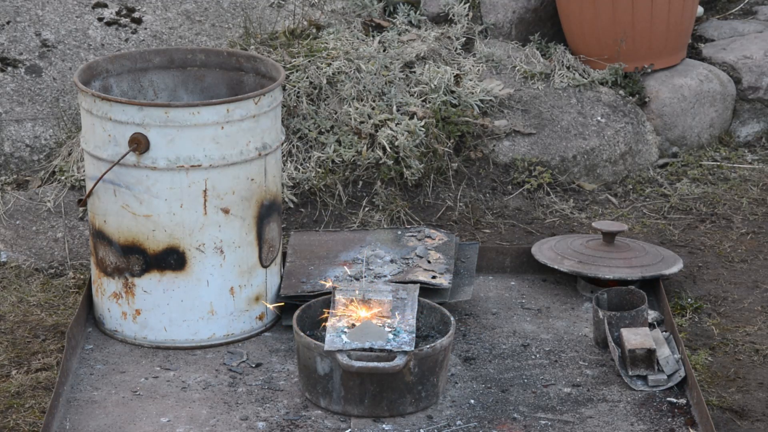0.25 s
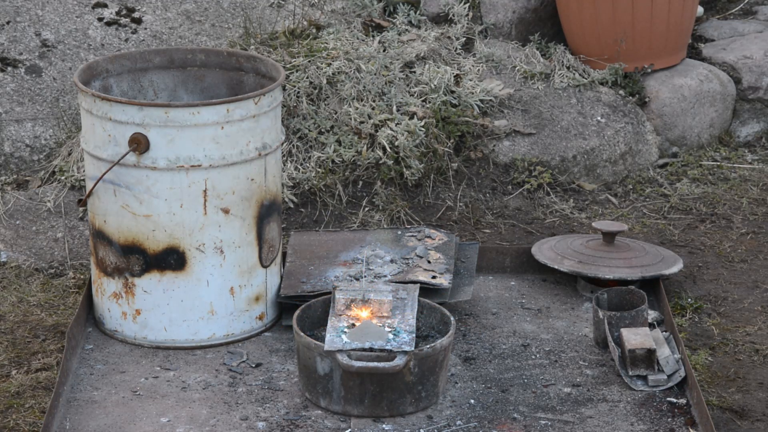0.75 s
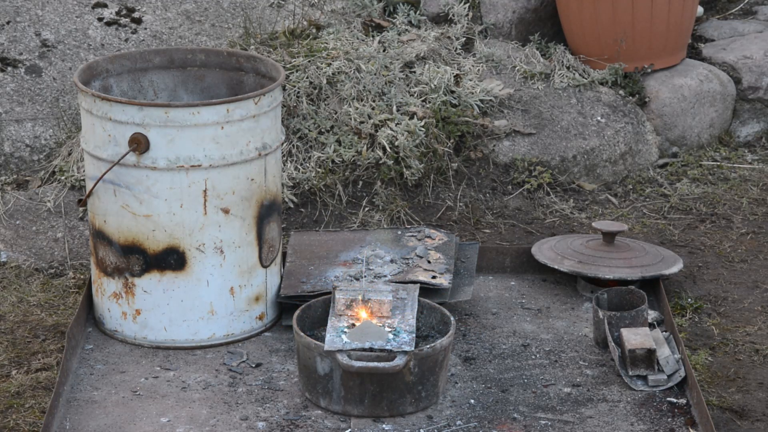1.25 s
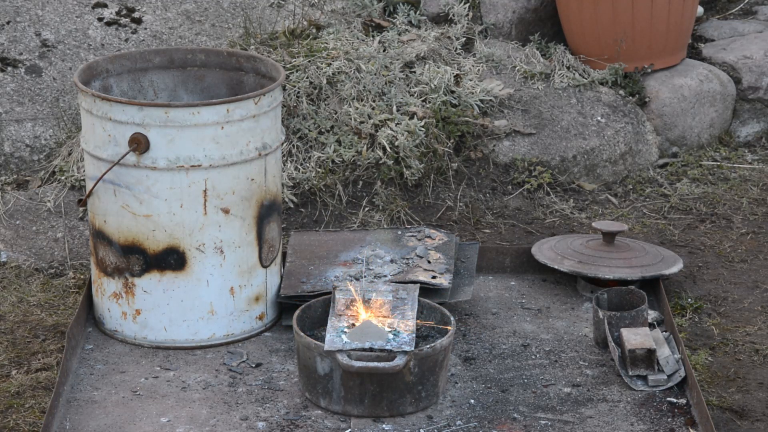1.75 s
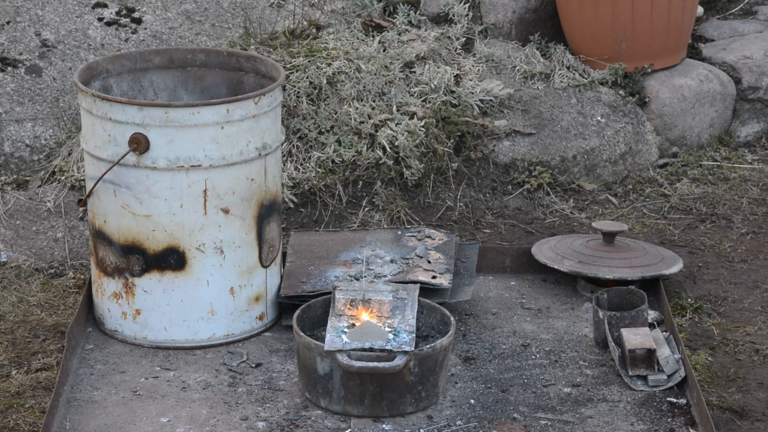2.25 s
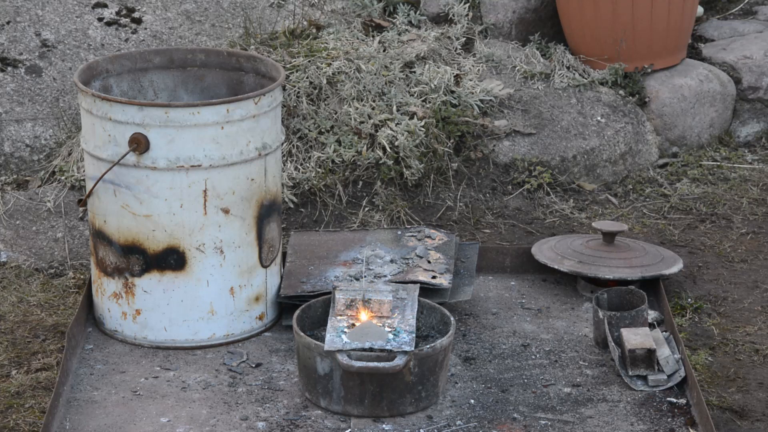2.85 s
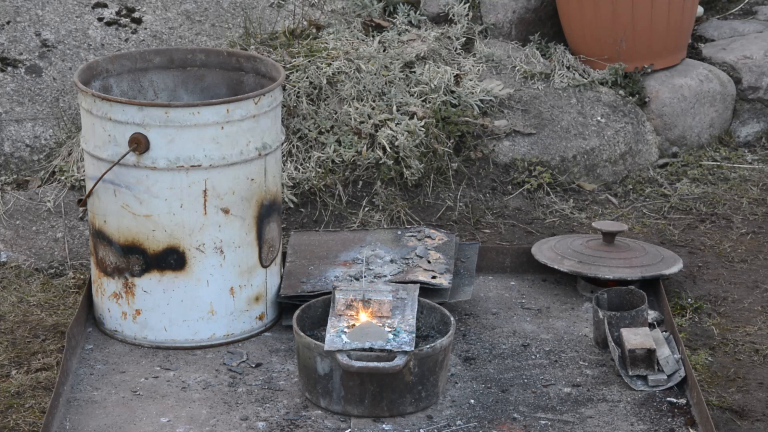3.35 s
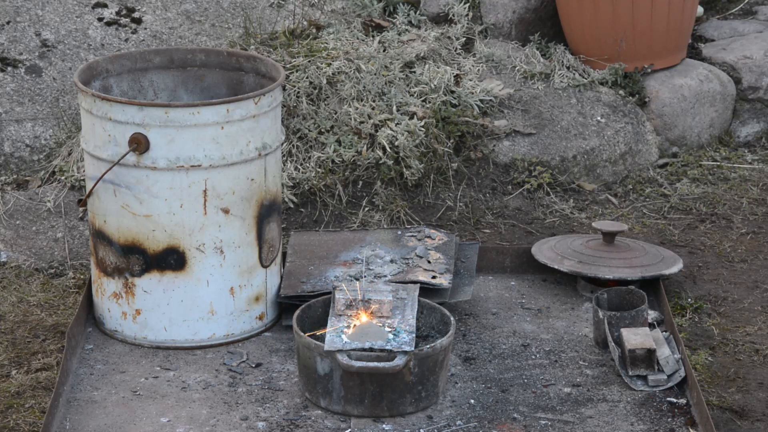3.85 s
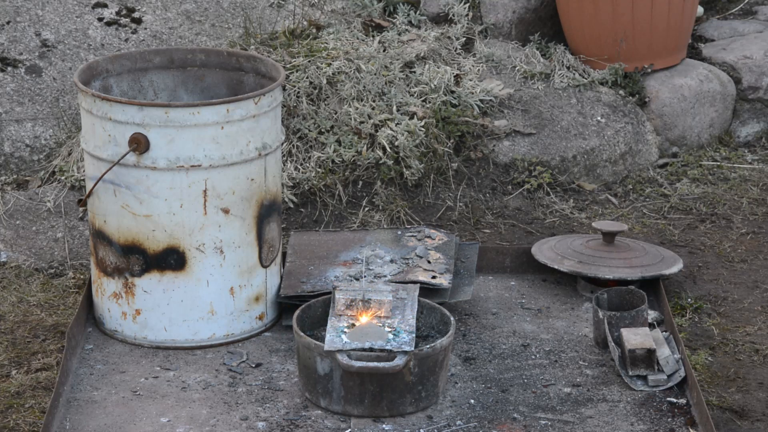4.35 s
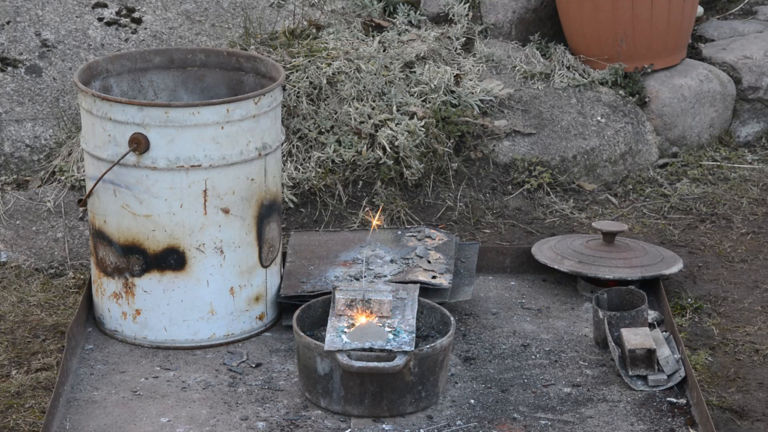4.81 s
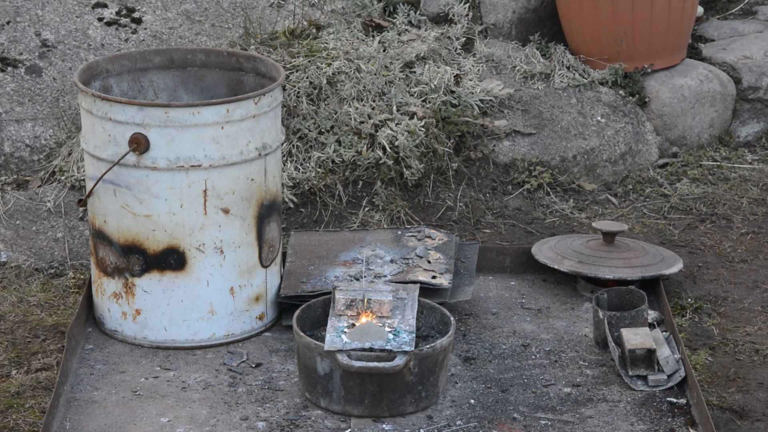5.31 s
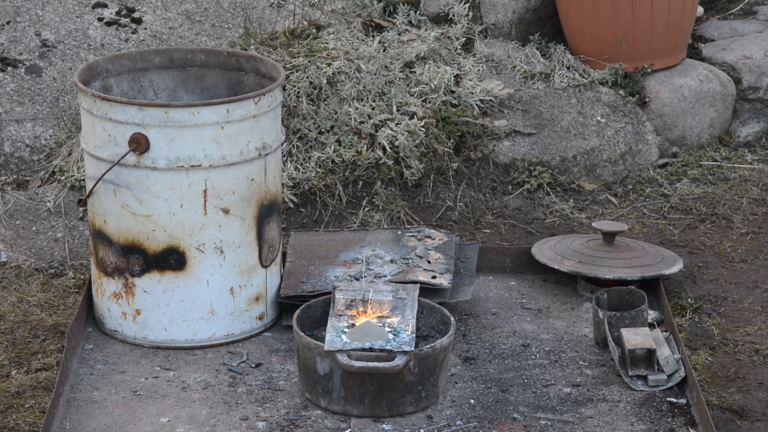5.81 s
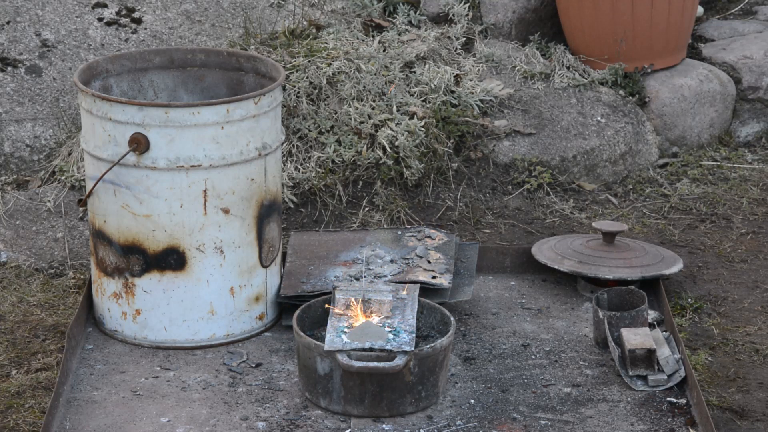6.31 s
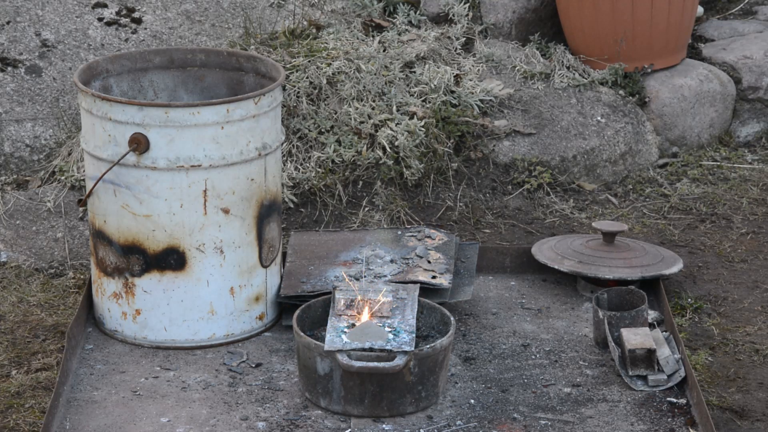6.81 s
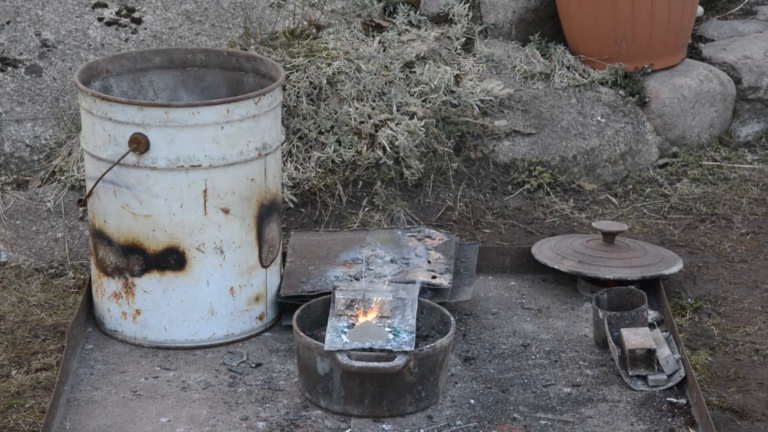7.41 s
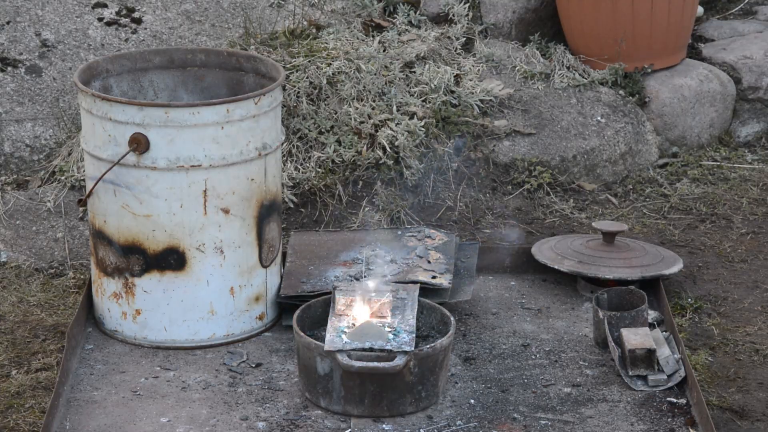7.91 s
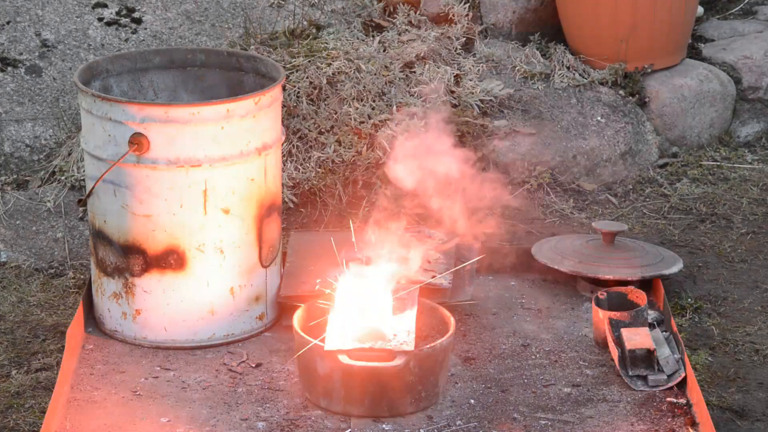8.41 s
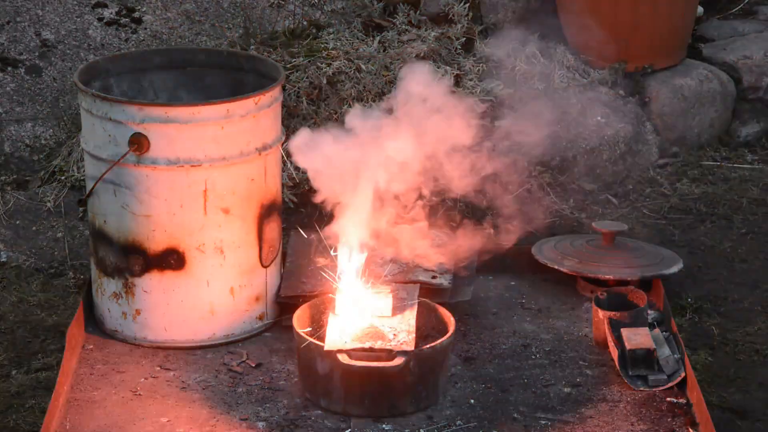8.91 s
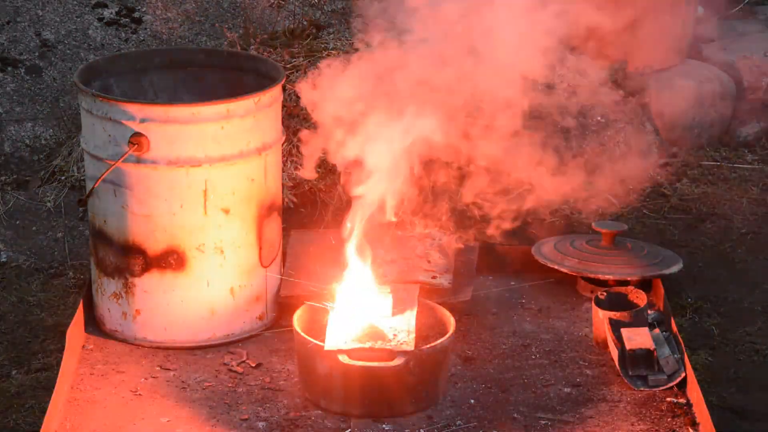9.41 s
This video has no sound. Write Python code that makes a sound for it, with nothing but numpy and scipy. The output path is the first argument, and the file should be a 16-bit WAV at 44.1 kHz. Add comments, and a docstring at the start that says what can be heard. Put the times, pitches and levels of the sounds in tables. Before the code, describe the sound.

Outdoors in a quiet garden, thrushes whistle clear gliding phrases with short echoes and a small bird sings thin high notes and trills. A fuse fizzes very faintly on a metal tray over a pot while feet shift in grit and dry grass. Sharp spits begin just past six seconds, the powder catches, and a crackling, popping hiss swells into a roar by the end. Small stereo camera microphone, soft air noise.

```python
"""Outdoors, a fuse of flaring noise fizzes faintly on a metal tray over a pot, in soft background air noise.
Thrushes and a small songbird sing gliding, echoing whistles; feet shift in grit and grass (filtered noise),
with small knocks and thuds (dying sines). From 1.5 to 3.2 s far bird chatter is a diffuse wash of noise.
Then the powder catches, spits and pops, and burns with a crackling roar: noise and clicks through metal rings."""
import sys
import numpy as np
from scipy import signal
from scipy.fft import rfft, irfft
from scipy.io import wavfile
from scipy.ndimage import uniform_filter1d

SR = 44100
rng = np.random.default_rng(int(sys.argv[2]) if len(sys.argv) > 2 else 0)


def to_linear_factor(level_db):
    """Convert decibel levels (scalar or array-like) to linear amplitude factors."""
    exponent = np.asarray(level_db, float) / 20
    return 10 ** exponent


def wrap_up_sound(samples):
    """Save the sound to the file named by the first command line argument, as 16-bit audio."""
    columns = np.atleast_2d(samples).T
    # keep every value between -1 and 1, then stretch to whole-number steps
    tamed = np.clip(columns, -1, 1)
    steps = np.round(tamed * 32767).astype(np.int16)
    wavfile.write(sys.argv[1], SR, steps)


N = 426006


def evened(x):
    """Scales a sound to rms 1."""
    return x / np.sqrt(np.mean(x ** 2) + 1e-20)


def read(points, hz):
    """Reads a spectrum table along a log-frequency axis."""
    f, value = np.transpose(points)
    return np.interp(np.log(hz + 1), np.log(f + 1), value)


def curve(rows):
    """Joins the points of a table (t/s, value) into one value per sample."""
    s, value = np.transpose(rows)
    return np.interp(np.arange(N) / SR, s, value)


def add(mix, s, sound):
    """Lays a sound into the mix at time s."""
    part = mix[round(s * SR):][:len(sound)]
    part += sound[:len(part)]


def wobble(seconds):
    """Slow random wandering of rms 1 that changes over about this time."""
    size = max(round(seconds * SR), 2)
    return evened(uniform_filter1d(uniform_filter1d(rng.standard_normal(N), size), size))


def swell(s, rise, fall):
    """A bump of height 1 at time s that grows and dies away exponentially."""
    t = np.arange(N) / SR - s
    return np.exp(np.where(t < 0, t / rise, -t / fall))


def grains(per_s, spread_db):
    """Random clicks, most small and a few large, scaled to rms 1."""
    size = to_linear_factor(spread_db * np.minimum(rng.exponential(1, N), 5)) * rng.standard_normal(N)
    return evened(size * (rng.random(N) < per_s / SR))


def colour(x, points, band):
    """Causal filter with this spectrum; white noise of rms 1 comes out with rms 1 inside the band."""
    hz = np.fft.rfftfreq(4096, 1 / SR)
    log_gain = np.maximum(read(points, hz), -100) * np.log(10) / 20
    full = np.r_[log_gain, log_gain[-2:0:-1]]
    # minimum phase: the filter answers as early as it can
    spectrum = np.exp(full - 1j * signal.hilbert(full).imag)
    taps = np.fft.ifft(spectrum).real[:2048]
    in_band = (hz > band[0]) & (hz < band[1])
    power = np.exp(2 * log_gain)[in_band].sum() / len(hz)
    return signal.oaconvolve(x, taps / np.sqrt(power))[:N]


def pair(x, other, same, lean):
    """Two microphone ports: a share of unrelated sound, and a balance, both by frequency."""
    hz = np.fft.rfftfreq(N, 1 / SR)
    likeness = np.clip(read(same, hz), 0, 1)
    mid = np.sqrt((1 + likeness) / 2) * rfft(x)
    side = np.sqrt((1 - likeness) / 2) * rfft(other)
    half_lean_db = read(lean, hz) / 2
    return irfft([(mid + side) * to_linear_factor(half_lean_db), (mid - side) * to_linear_factor(-half_lean_db)], N)


# strength of the burning powder's fizz: (t/s, level/dB); the first row is the moment it catches
POWDER_BURN = [(6.45, -67), (6.56, -55.5), (6.71, -51), (6.78, -51.5), (6.81, -60.5), (6.88, -54.5),
               (6.99, -49), (7.03, -57), (7.11, -54.5), (7.15, -48.5), (7.28, -44.5), (7.4, -51.5),
               (7.45, -47), (7.67, -51), (7.75, -45.5), (7.8, -45.5), (8.07, -41.5), (8.3, -45),
               (8.38, -48), (8.41, -43.5), (8.62, -42.5), (8.76, -42), (8.8, -43.5), (8.95, -42),
               (9.1, -47.5), (9.16, -52.5), (9.185, -42), (9.66, -44)]
# tone of the high fizz, the mid gas roar and the low flame: (f/Hz, level/dB)
FIZZ_TONE = [(1760, -34.5), (3000, -3), (3260, 0.5), (3570, -13), (3960, -9), (5110, -4), (5520, -2),
             (15200, 0), (15700, 5)]
ROAR_TONE = [(410, -53), (700, -16), (773, -20.5), (957, -13.5), (1160, -9.5), (1350, -9.5), (2070, -1.5),
             (2700, -9), (5000, -15.5), (6500, -39), (11000, -120)]
FLAME_TONE = [(35, -67), (60, -25), (188, -6.5), (398, 2), (466, 4.5), (633, -1), (786, -6.5), (900, 1),
              (1170, -15), (1980, -120)]
# how alike the two ports are: (f/Hz, likeness 0 to 1)
FIRE_LIKENESS = [(2000, 1), (7000, 0.99), (11000, 0.92), (13000, 0.87), (15000, 0.63)]
# left over right: (f/Hz, level/dB)
FIRE_BALANCE = [(11500, -0.5), (13000, -1), (14500, -3.5)]


def fire():
    """Bursting grains and jets of gas sputter together over the flutter of the flame."""
    t = np.arange(N) / SR
    lit = t > POWDER_BURN[0][0]
    burn_db, fuse_level, sputter_db = curve(POWDER_BURN), fuse(), sputter()
    fizz = np.where(lit, to_linear_factor(burn_db), fuse_level)
    fizz = fizz * to_linear_factor(sputter_db + 0.7 * wobble(0.015))  # the crackle is the more fitful
    jets = np.where(lit, follower(burn_db, full_db=-44.5, slope=1, seconds=0.03), to_linear_factor(3.5) * fuse_level)
    jets = jets * to_linear_factor(0.75 * sputter_db)
    flutter = lit * follower(burn_db, full_db=-59.5, slope=0.93, seconds=0.093)
    flutter = flutter * to_linear_factor(2 * (t - N / SR))  # the flame grows 2 dB per second up to the end
    spit(fizz, jets)
    bangs = pops()
    ports = []
    for port in range(2):
        crackle = 0.78 * rng.standard_normal(N) + 0.51 * grains(per_s=3000, spread_db=2.0)
        gas = 0.64 * rng.standard_normal(N) + 0.31 * grains(per_s=900, spread_db=4.0)
        flame = flutter * to_linear_factor(1.5 * wobble(0.017)) * rng.standard_normal(N)
        high = colour(fizz * crackle + bangs, FIZZ_TONE, (9000, 15500))
        low = colour(flame, FLAME_TONE, (100, 700))
        roar = colour(jets * gas + 0.43 * bangs, ROAR_TONE, (1200, 3000))
        ports.append(tray(high + low + roar))
    return pair(*ports, FIRE_LIKENESS, FIRE_BALANCE)


def follower(burn_db, full_db, slope, seconds):
    """A layer of the fire that follows the smoothed fizz; slope is its dB per dB of fizz."""
    smooth_db = uniform_filter1d(burn_db, round(seconds * SR))
    return to_linear_factor(full_db + slope * (smooth_db + 44))  # the layer has full_db when the fizz is at -44 dB


# now and then the fuse flares: (peak t/s, level/dB, rise t/s, fall t/s)
FUSE_FLARES = [(.33, -67, 0.34, .08), (1.55, -61, 0.033, 0.036), (1.87, -66.5, 0.07, 0.52),
               (3.17, -62.5, 0.19, 0.1), (4.24, -64, 0.23, 0.073), (5.03, -72, .02, 0.16),
               (6.41, -60, 0.057, 0.06)]


def fuse():
    """Strength of the low steady fizz of the fuse, with its flares on top."""
    return to_linear_factor(-71.5) + sum(to_linear_factor(db) * swell(s, rise, fall) for s, db, rise, fall in FUSE_FLARES)


def sputter():
    """Many small clumps flare at chance moments and shake the fire's strength, in dB."""
    flares_per_s, rise_s, fall_s = 160, 0.0017, 0.0018
    starts = (rng.random(N) < flares_per_s / SR) * rng.exponential(1, N)
    t = np.arange(1000) / SR
    shape = 1.26 * (1 - np.exp(-t / rise_s)) * np.exp(-t / fall_s)
    flares = signal.oaconvolve(starts, shape)[:N]
    return 3.8 * (np.minimum(flares, 2) - flares.mean()) + 1.35 * wobble(0.0016)


# spits, clumps of bursting grains: (t/s, nominal peak level/dB)
SPITS = [(.3366, -47), (3.044, -41), (4.0407, -41), (4.239, -38), (4.728, -42), (5.1452, -40),
         (6.1365, -30), (6.266, -30), (6.403, -22.5), (6.5215, -35), (6.5564, -28), (6.5858, -34),
         (6.641, -34), (6.6533, -29.5), (6.708, -22.5), (6.7321, -34), (6.8244, -30.5), (6.864, -28),
         (6.8774, -33), (6.9102, -28.5), (6.9406, -38), (6.9716, -30), (7.0519, -38), (7.0764, -33),
         (7.1207, -33), (7.2534, -29), (7.406, -40), (7.424, -23), (7.641, -32), (7.6675, -40),
         (7.7169, -30), (7.74, -28), (8.31, -33), (8.4088, -43), (8.6482, -41), (8.6784, -26),
         (9.1775, -37), (9.2923, -40)]


def spit(fizz, jets):
    """Clumps burst with a quick swell and a slower fade of crackle, each with a low puff of gas."""
    crest_db = 17  # peaks stand this far over the mean crackle
    puff_db = -19.5  # the puff's strength against the nominal peak
    u = np.arange(0, 6, 3 / (0.009 * SR))  # time in steps of 3 ms
    shape = (u * np.exp(1 - u)) ** 1.4
    for s, db in SPITS:
        add(fizz, s - .0016, to_linear_factor(db - crest_db) * shape)
        add(jets, s - .0016, to_linear_factor(db + puff_db) * shape)


# single large grains going off: (t/s, nominal peak level/dB)
POPS = [(6.787, -19), (7.0848, -22), (7.1806, -19), (7.231, -18), (7.79, -22), (8.1449, -11.5),
        (8.737, -20), (8.746, -25), (8.758, -15.5), (8.864, -16), (8.9092, -19), (8.9495, -14),
        (8.954, -19), (8.9542, -17), (9, -15), (9.003, -17), (9.5113, -17)]


def pops():
    """A large grain bursts in a few quick snaps: a sharp push, a swing back, dying noise."""
    crest_db, fall_s = 7.5, 0.00033  # the nominal peak over the first push; fading of the noise
    t = np.arange(120) / SR
    bangs = np.zeros(N)
    for s, db in POPS:
        after = .45 * rng.standard_normal(120) * np.exp(-t / fall_s)
        add(bangs, s, to_linear_factor(db - crest_db) * np.r_[1, -.45, -.3, after])
    return bangs


# bounces off tray, pot and drum: (delay t/ms, share of the direct sound)
BOUNCES = [(0.433, 0.18), (1.162, 0.037), (1.40, 0.14), (1.47, -0.1), (1.68, 0.0097)]
# narrow rings of the sheet-metal tray and pot: (f/Hz, width f/Hz, level/dB over the direct sound)
METAL_RINGS = [(625, 23, 3), (1038, 35, 1.5), (1411, 55, 1.5), (1614, 13, 1.5), (2220, 37, -12),
               (3060, 12, -26), (2980, 22, -3.5), (3520, 33, 3), (3644, 58, 3), (4040, 26, 5.5),
               (5130, 53, -1.5), (5400, 22, -16), (5830, 40, -18)]


def tray(x):
    """Bounces within two milliseconds, duller than the direct sound, and the rings of the metal."""
    hz = np.fft.rfftfreq(N, 1 / SR)
    bounce = sum(share * np.exp(-2j * np.pi * hz * ms / 1000) for ms, share in BOUNCES)
    dull = 1 / (1 + (hz / 11000) ** 2)
    rings = sum(to_linear_factor(db) / (1 + 2j * (hz - f) / width) for f, width, db in METAL_RINGS)
    return irfft(rfft(x) * (1 + bounce * dull) * (1 + rings), N)


def birds():
    """Two singers: the thrushes reach the right port first, the small bird the left."""
    return (garden(thrushes(), t60=1.0, wet_db=-6.0, lean_db=-1.5, lead_us=-20, flutter_db=2.0)
            + garden(small_bird(), t60=0.46, wet_db=-5, lean_db=-.6, lead_us=26.6, flutter_db=2.0))


# plain thrush whistles, each one glide: (start t/s, length t/s, level/dB, from f/Hz, to f/Hz)
GLIDES = [(0, 0.099, -56, 2510, 2475), (.15, 0.1, -54, 1740, 1864), (0.223, 0.064, -54.5, 2000, 1890),
          (0.283, .04, -56, 2600, 2880), (.31, 0.019, -55, 4320, 4000), (.32, 0.043, -53, 2430, 2180),
          (.36, 0.052, -56.5, 3800, 4030), (.41, .06, -58, 4050, 4830), (.465, .035, -61, 4800, 4850),
          (1.566, .04, -52, 2635, 2850), (1.612, 0.21, -60.5, 2030, 1934), (1.6, 0.045, -59, 4000, 3980),
          (1.671, .09, -62, 3950, 3960), (1.759, .155, -45.5, 2025, 2176), (1.97, 0.067, -53, 1990, 2390),
          (2.04, 0.26, -55.5, 2394, 2085), (2.344, 0.1, -49.5, 2147, 2030), (2.5, 0.094, -49.5, 2360, 2220),
          (2.577, .025, -51.5, 2430, 2850), (2.652, 0.0145, -53, 3070, 2500),
          (2.77, 0.076, -58, 1870, 1820), (2.87, 0.04, -54, 2770, 2330), (2.91, 0.099, -48.5, 2300, 2203),
          (3.09, .03, -58, 4520, 4050), (3.11, .04, -60, 3470, 3690), (3.148, .07, -59, 3710, 4670),
          (3.215, 0.037, -60, 4770, 4850), (3.24, 0.094, -56, 2420, 2500), (3.33, 0.06, -55, 2500, 2830),
          (3.45, 0.078, -58, 2790, 3040), (3.52, 0.036, -56, 3110, 3310), (5.1, 0.05, -55, 2570, 2250),
          (5.18, 0.074, -52.5, 2050, 2020), (5.25, 0.068, -53, 2020, 2190), (5.19, .19, -53.5, 2470, 2500),
          (5.598, 0.14, -53.5, 2310, 2240), (6.075, 0.091, -53.5, 2860, 2670),
          (6.14, 0.065, -48, 2460, 2290), (6.212, .06, -49, 2290, 2350), (6.3, 0.092, -63, 3530, 3400),
          (6.3, 0.14, -61, 1757, 1665), (6.34, .05, -56, 2020, 1810), (6.43, .065, -53.5, 2100, 2030),
          (6.75, 0.054, -52, 2084, 2086), (7.15, .12, -48.5, 2630, 2250), (7.277, 0.14, -50.5, 1880, 2075),
          (7.45, 0.054, -54, 1677, 1626), (7.728, .075, -48, 2310, 2360), (7.812, 0.021, -52, 2400, 2900),
          (7.74, 0.07, -46, 1990, 1905), (7.87, .05, -49, 2610, 2054), (7.916, 0.034, -48, 2040, 2100),
          (8.16, .06, -48, 2720, 2620), (8.263, .04, -53, 2700, 2520)]
# warbled thrush phrases, one table each: (t/s, f/Hz, level/dB)
WARBLES = [
    [(.375, 2620, -49), (.41, 2380, -49.5), (.46, 2104, -43), (.5, 2356, -49), (.56, 2300, -48),
     (.62, 2225, -46)],
    [(.5, 2410, -72), (.56, 2656, -50), (.61, 2740, -66), (.66, 2880, -51.5), (.71, 2920, -56),
     (.735, 2950, -66), (.79, 3160, -51.5), (.86, 3850, -67)],
    [(.745, 1610, -52), (.775, 1742, -62), (.79, 2060, -46), (.82, 2116, -41.5), (.84, 2090, -46.5),
     (.862, 1450, -54)],
    [(1.035, 2510, -53), (1.1, 2670, -43), (1.25, 2810, -46.5), (1.43, 2557, -46.5), (1.48, 2240, -59)],
    [(5.43, 2920, -70), (5.47, 2660, -49), (5.515, 1650, -54), (5.54, 2032, -48), (5.6, 2206, -50.5),
     (5.67, 2210, -56), (5.72, 2110, -48)],
    [(5.73, 2530, -51), (5.78, 2204, -48), (5.84, 2170, -50), (5.895, 2360, -48.5), (5.92, 2680, -52),
     (5.955, 2050, -47.5), (6.0, 2124, -50)],
    [(6.18, 2520, -49), (6.24, 2683, -48), (6.3, 2800, -52), (6.38, 2756, -51), (6.43, 2614, -51)],
]


def thrushes():
    """Whistled glides that swell late in their length, and warbled phrases."""
    song = np.zeros(N)
    top = 0.82  # a glide is loudest at this share of its length
    for s, length, db, from_hz, to_hz in GLIDES:
        top_hz = from_hz + top * (to_hz - from_hz)
        rows = [(0, from_hz, -2.5), (top * length, top_hz, 0), (length, to_hz, -4)]
        whistle(song, rows, s, db)
    for rows in WARBLES:
        whistle(song, rows)
    return song


# the small bird's lead, hook and trill notes: (t/s from start, f/Hz before pitch factor, level/dB in the song)
NOTE_SHAPES = [
    [(-.025, 8770, -16), (0, 8550, -7), (.025, 8230, -0.5), (.06, 7990, -2), (.125, 7800, -4),
     (.175, 7680, -1), (.205, 7630, -10)],
    [(0, 4700, -15), (.016, 6700, -9), (.024, 6820, -6), (.06, 6450, -4), (.09, 6200, 0), (.105, 6140, -3)],
    [(0, 5940, -11), (.013, 5400, -6), (.023, 5140, -0.5), (.035, 4960, -4), (.048, 4910, -2),
     (.058, 4965, -3), (.064, 5170, -6)],
]
# its songs: (first hook t/s, spacing factor, level/dB, trill change level/dB per note, pitch factor)
SONGS = [(1.872, 1.047, -42, -1.37, 0.99), (4.99, 0.99, -43.5, -0.1, .98), (7.158, .99, -45, -1.5, 1.003)]
# one value per song: (level/dB of the long lead note against the hooks)
LEAD_LEVEL = [-8, -7, -12]
# one value per song: (spacing of trill notes t/s)
TRILL_GAP = [.108, .107, .112]
# one value per song: (pitch factor of the trill)
TRILL_PITCH = [0.98, 0.994, 0.98]
# one value per song: (number of trill notes)
TRILL_NOTES = [6, 3, 3]


def small_bird():
    """Each song is one long lead note, two hooks and a trill that lags as it tires."""
    song = np.zeros(N)
    lead, hook, trill = NOTE_SHAPES
    songs = zip(SONGS, LEAD_LEVEL, TRILL_GAP, TRILL_PITCH, TRILL_NOTES)
    for (s, spacing, db, fade_db, factor), lead_db, gap, pitch, count in songs:
        whistle(song, lead, s - spacing * .278, db + lead_db, factor, waver_hz=25)
        for k in range(2):
            whistle(song, hook, s + spacing * .155 * k, db, factor, waver_hz=25)
        for k in range(count):
            start = s + spacing * .298 + gap * k + 0.0002 * k ** 3
            sharp = 1 if k else 1.02  # the first note is a little sharp
            whistle(song, trill, start, db + fade_db * k, pitch * sharp, waver_hz=24.65)
    return song


def whistle(mix, rows, s0=0, db=0, factor=1, waver_hz=14):
    """A near sine that follows pitch and level, with soft ends; moving air makes the pitch waver."""
    s, hz, level_db = np.transpose(rows)
    t = np.arange(s[0], s[-1], 1 / SR)
    waver = evened(uniform_filter1d(uniform_filter1d(rng.standard_normal(len(t)), 200), 200))
    pitch = factor * np.interp(t, s, hz) + waver_hz * waver
    tone = np.sin(2 * np.pi * np.cumsum(pitch) / SR)
    ends = signal.windows.tukey(len(t), min(0.013 / (s[-1] - s[0]), 1))
    level = np.sqrt(2) * to_linear_factor(db + np.interp(t, s, level_db))  # the table level is rms
    add(mix, s0 + s[0], level * tone * ends)


def garden(x, t60, wet_db, lean_db, lead_us, flutter_db):
    """Trees and walls scatter a song: it flutters, and sparse echoes trail behind it; one port hears it first."""
    t = np.arange(SR // 2) / SR
    sparse = rng.random((2, len(t))) < .05
    taps = rng.standard_normal((2, len(t))) * sparse * to_linear_factor(-60 * t / t60) * (t > .004)
    taps[1] = 1.15 * taps[0] + 0.32 * taps[1]  # the ports share most of their echoes
    taps = taps / np.linalg.norm(taps, axis=1)[:, None]
    tail = signal.fftconvolve(x[None], taps, axes=1)[:, :N]
    heard = x * to_linear_factor(flutter_db * wobble(0.0028)) + to_linear_factor(wet_db) * tail
    side = np.array([[.5], [-.5]])  # left, right
    lead = np.exp(2j * np.pi * np.fft.rfftfreq(N, 1 / SR) * side * lead_us / 1e6)
    return irfft(rfft(heard) * lead, N) * to_linear_factor(side * lean_db)


def ground_and_chatter():
    """Shifting feet, small knocks and thuds of the ground, with the wash of far bird chatter."""
    left, right = rustle_and_chatter()
    return pair(left + knocks() + thuds(), right, [(300, 0.81), (3000, 0.77)], [(300, -2.0), (3000, -2.0)])


# feet shifting, and (rows at 1.62 and 2.9 s) a long diffuse wash of far bird chatter from 1.5 to 3.2 s:
# (peak t/s, low noise level/dB, high noise over it level/dB, rise t/s, fall t/s)
STIRS_AND_CHATTER = [(.42, -75, 7, .3, .08), (.77, -69, -7, .07, 0.22), (1.62, -73, 7.5, 0.15, 0.77),
                     (2.9, -67.5, 4.5, 1, 0.055), (3.2, -58.5, 2.5, 0.12, 0.13),
                     (3.93, -61, -0.5, 0.25, 0.1), (4.15, -63, 0.5, .08, 0.17),
                     (4.43, -61, -1.5, 0.22, 0.19), (5.15, -59, -1, 0.077, 0.022),
                     (5.27, -54, -4.5, 0.018, 0.036), (5.59, -56.5, -4, 0.092, 0.14),
                     (5.84, -67, -15, .04, 0.81)]
# single brushes through the dry grass: (t/s, high noise level/dB, length t/s)
BRUSHES = [(3.924, -62, 0.087), (4.058, -61, 0.18), (4.25, -64, 0.027), (4.326, -62, 0.032),
           (4.406, -61, 0.045), (4.505, -60, 0.047)]
# tone of the low noise, mostly crunching grit: (f/Hz, level/dB)
LOW_TONE = [(59, -66), (100, -21.5), (304, -10), (395, -7.5), (888, 0.5), (1500, -1.5), (2600, 1),
            (9000, -20), (11700, -61), (19800, -120)]
# tone of the high noise, grass underfoot and far chatter: (f/Hz, level/dB)
HIGH_TONE = [(1500, -15), (2800, 9), (3800, 6.5), (5500, 2.5), (9000, -17)]


def rustle_and_chatter():
    """Rough low and high noise swells with shifting feet and with far bird chatter, and stops at 6.6 s."""
    stirring = to_linear_factor(1.32 * wobble(0.014)) * (np.arange(N) / SR < 6.6)
    low, high = np.full(N, to_linear_factor(-69.5)), np.full(N, to_linear_factor(-77.5))
    for s, db, over_db, rise, fall in STIRS_AND_CHATTER:
        bump = swell(s, rise, fall)
        low += to_linear_factor(db) * bump
        high += to_linear_factor(db + over_db) * bump
    for s, db, length in BRUSHES:
        add(high, s, to_linear_factor(db) * np.hanning(round(length * SR)))
    ports = []
    for port in range(2):
        rough = stirring * (0.92 * rng.standard_normal(N) + .5 * grains(per_s=1600, spread_db=3.0))
        low_noise = colour(low * rough, LOW_TONE, (400, 1500))
        high_noise = colour(high * rough, HIGH_TONE, (3100, 4500))
        ports.append(low_noise + high_noise)
    return ports


# small knocks and snaps underfoot: (t/s, peak level/dB, f/Hz, time to fall 60 dB t/s)
KNOCKS = [(.849, -44, 1510, .03), (3.223, -45.5, 430, 0.066), (3.351, -46, 603, 0.028),
          (3.409, -33, 2410, 0.0087), (4.041, -44, 2000, .012), (4.381, -37, 1140, 0.015),
          (4.414, -38, 880, 0.016), (5.256, -50, 1010, .04), (5.557, -42, 1210, .04),
          (5.601, -39.5, 1066, 0.051)]


def knocks():
    """Small things struck underfoot ring as quickly dying sines."""
    t, hits = np.arange(SR // 4) / SR, np.zeros(N)
    for s, db, hz, t60 in KNOCKS:
        add(hits, s, to_linear_factor(db - 60 * t / t60) * np.sin(2 * np.pi * hz * t))
    return hits


# footfalls through the ground: (t/s, nominal level/dB, nominal f/Hz, nominal low swell level/dB)
THUDS = [(1.217, -60, 244, -69), (1.813, -59, 245, -86), (2.212, -51, 247, -69), (2.698, -61, 200, -70),
         (2.837, -57.5, 248, -83), (3.22, -55, 210, -81), (3.739, -68, 63, -72), (4.349, -64, 75.4, -75),
         (4.409, -59, 194, -74)]


def thuds():
    """A short push that sinks in pitch, then the soil takes the weight with a low swell."""
    t, hits = np.arange(SR // 4) / SR, np.zeros(N)
    for s, db, hz, low_db in THUDS:
        # the pitch starts at 1.17 times the table's and sinks towards zero
        sinking = np.sin(2 * np.pi * hz * 0.0322 * (1 - np.exp(-t / 0.0275)))
        push = to_linear_factor(db - 60 * t / 0.1) * sinking * np.minimum(t / 0.0018, 1)
        low = to_linear_factor(low_db) * t / 0.046 * np.exp(1 - t / 0.032) * np.sin(2 * np.pi * 62 * t)
        add(hits, s, push + low)
    return hits


# tone of the background air: (f/Hz, level/dB)
AIR_TONE = [(15, -50), (25, -40), (48, -21.5), (324, -3), (587, -2), (654, -1.5), (1120, -4.5),
            (1280, -2.5), (1980, -2), (5820, -11), (7630, -8), (8270, -11), (15800, -10.5)]
# how alike the two ports are: (f/Hz, likeness 0 to 1)
AIR_LIKENESS = [(60, 1), (180, 0.8), (550, 0.84), (1650, 0.6), (4970, 0.051), (15000, 0.011)]


def air():
    """Far traffic, leaves and the hiss of the microphone, as noise drifting slowly in level."""
    ports = []
    for port in range(2):
        drifting = rng.standard_normal(N) * to_linear_factor(1.45 * wobble(0.13))
        ports.append(colour(drifting, AIR_TONE, (100, 4000)))
    return to_linear_factor(-59) * pair(*ports, AIR_LIKENESS, [(60, -.4), (400, -1.6), (15000, -0.49)])


def scene():
    """Everything heard at the two microphone ports."""
    return fire() + birds() + ground_and_chatter() + air()


def top_cut(x):
    """Nothing passes above the cut-off."""
    return signal.sosfilt(signal.butter(12, 16920, fs=SR, output="sos"), x)


def record(dry):
    """A small camera keeps only what lies below a steep edge at 15760 Hz."""
    edge = signal.firwin(1601, 15760, window=("kaiser", 10), fs=SR)
    mix = signal.oaconvolve(dry, edge[None], "same")
    return top_cut(mix)


dry = scene()
out = record(dry)
wrap_up_sound(out)
```